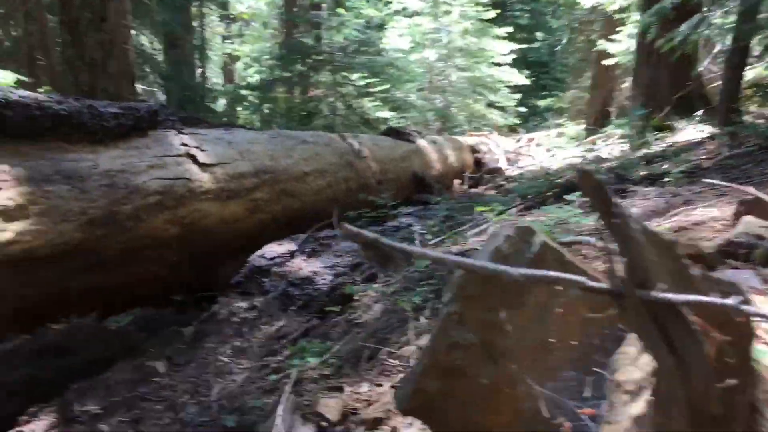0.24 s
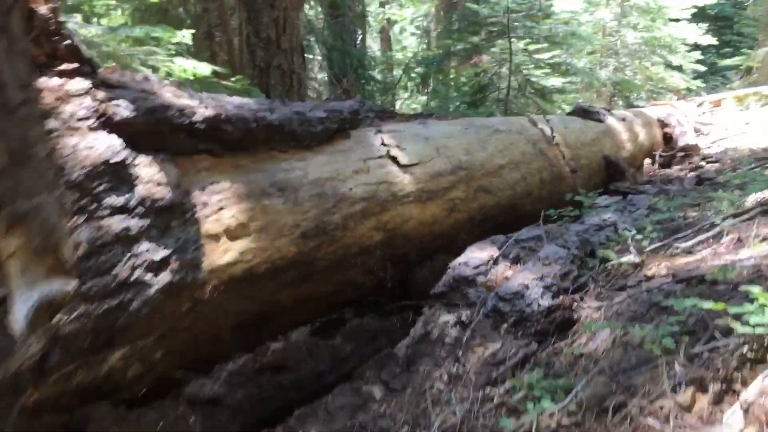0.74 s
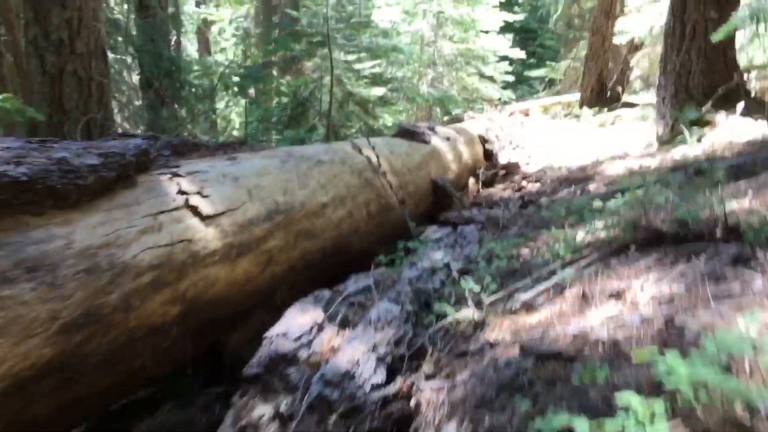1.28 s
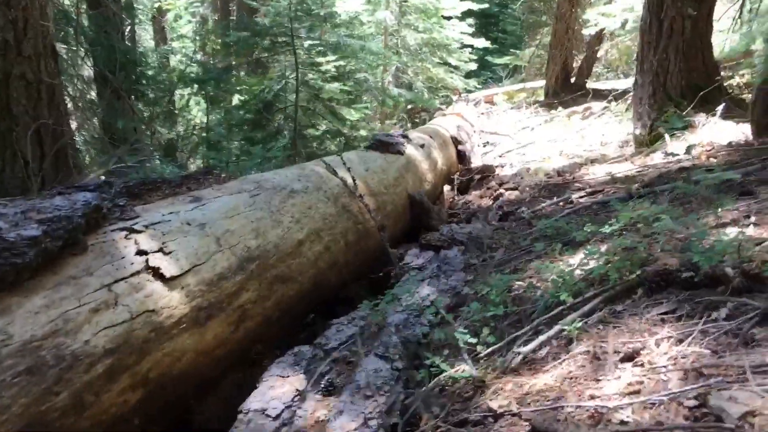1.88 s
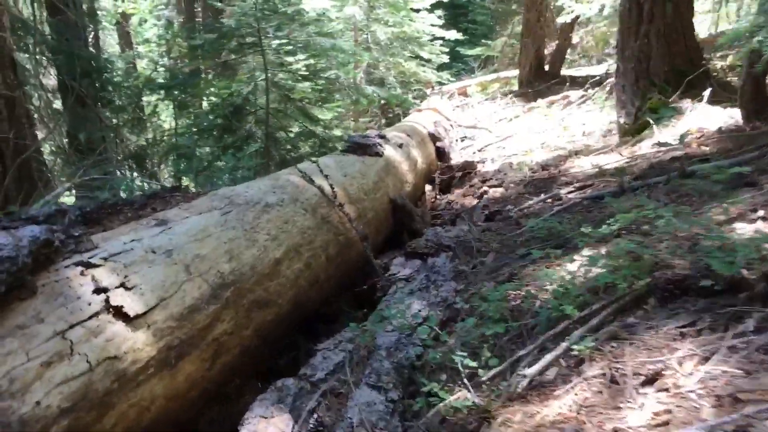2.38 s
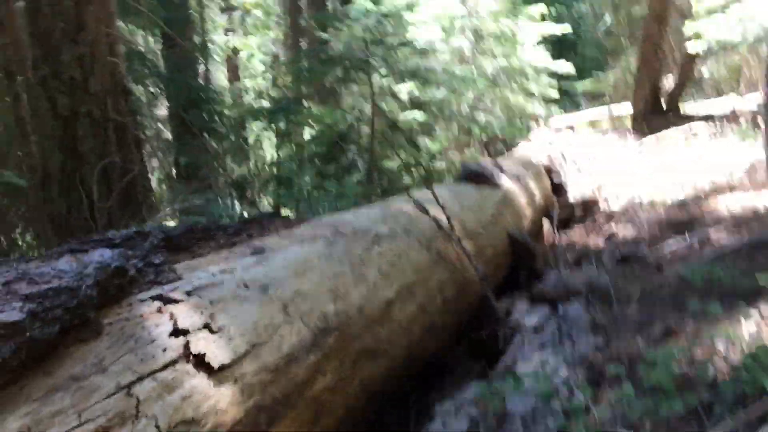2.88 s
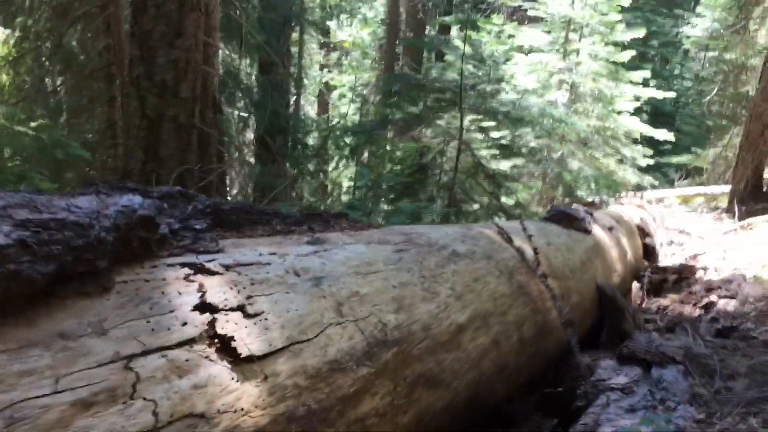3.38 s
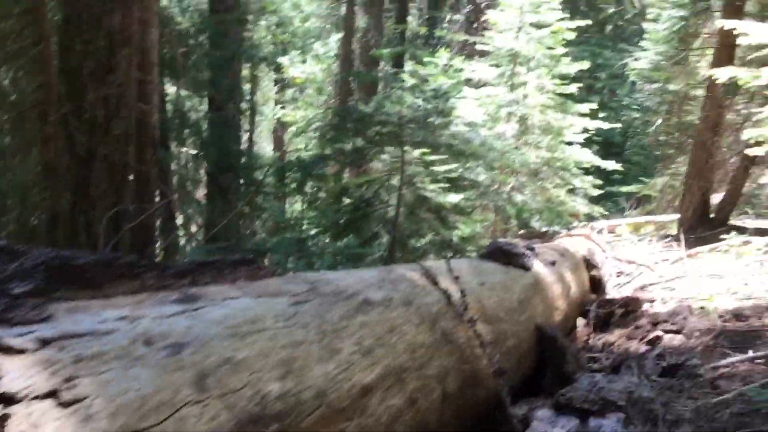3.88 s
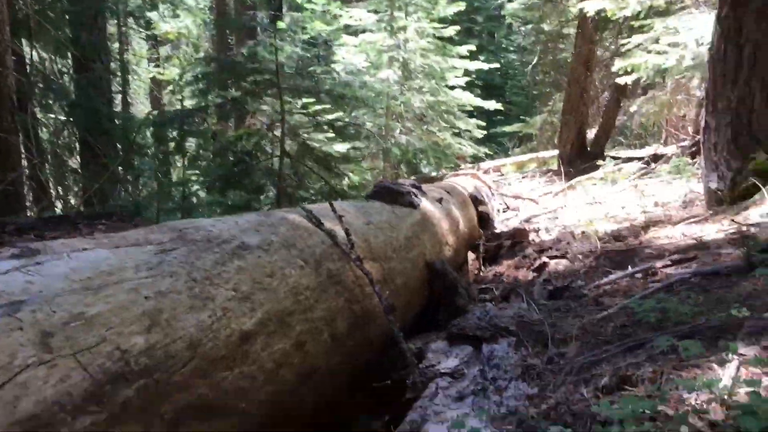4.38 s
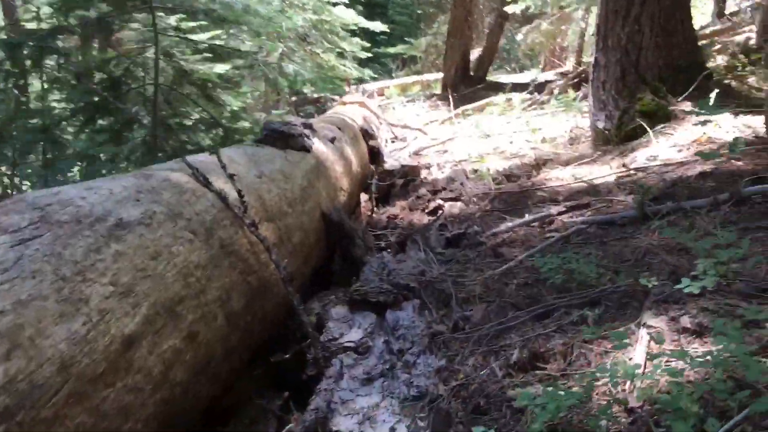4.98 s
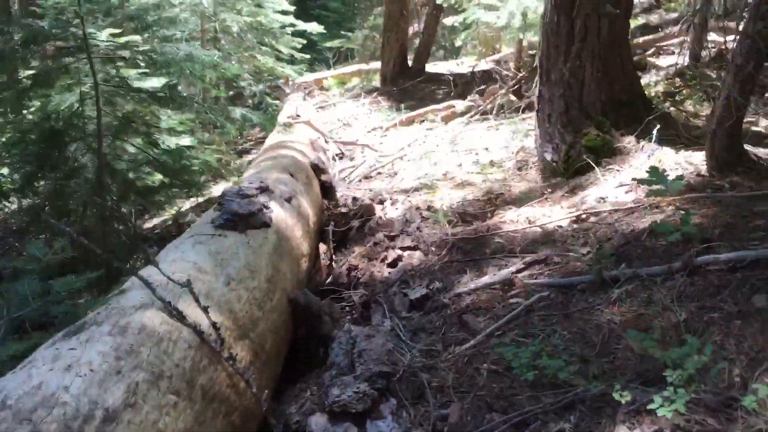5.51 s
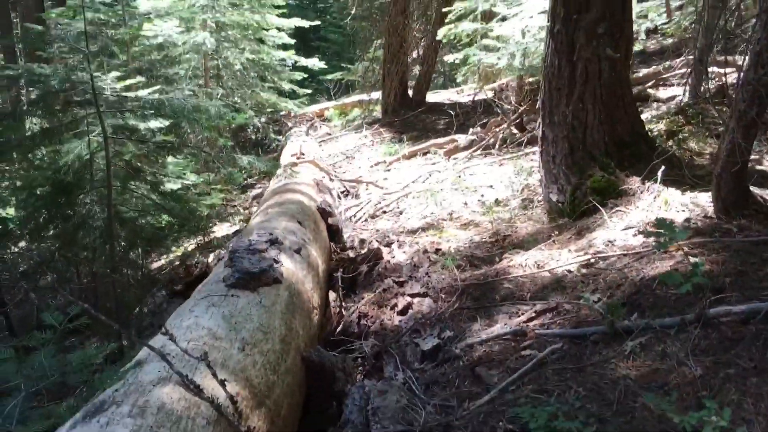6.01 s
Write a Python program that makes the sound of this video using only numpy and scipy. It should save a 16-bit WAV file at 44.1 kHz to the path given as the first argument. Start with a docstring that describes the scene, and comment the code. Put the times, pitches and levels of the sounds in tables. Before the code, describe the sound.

Someone picks their way over dry forest litter, rustling, crackling, snapping twigs and thumping softly on springy ground, growing busier towards the end.

```python
"""Footsteps pick their way down a steep forest slope of dry needles and twigs: each stroke of a foot
is friction noise in three colours, scuff, rustle and crisp crackle, roughened by tiny breaks and ticks.
Twigs snap as volleys of noise ringing at their pitch; five short damped tones colour the loud snap.
Heels and weight thud as decaying sines on soft ground, and slipping soles rasp through resonances.
Behind them lie faint noise echoes from the trunks and the forest's even hush of coloured noise."""
import sys
import numpy as np
from scipy import signal
from scipy.fft import rfft, irfft, next_fast_len
from scipy.io import wavfile

SR = 44100
rng = np.random.default_rng(int(sys.argv[2]) if len(sys.argv) > 2 else 0)


def store_wav(level_fs):
    """Save 16-bit WAV to argv[1]."""
    pcm = np.round(np.clip(np.atleast_2d(level_fs), -1, 1) * 32767)
    wavfile.write(sys.argv[1], SR, pcm.T.astype(np.int16))


N = 275625

# forest hush, relative spectrum: [f/Hz, level/dB per Hz]
FOREST_SPECTRUM = [(22, 3), (60, 2.5), (130, 0.5), (350, -1.5), (500, -4.5), (1000, -9), (2000, -18),
                   (3000, -21), (6000, -27.5), (10400, -28), (16000, -32)]
FOREST_DB = -62
CUTOFF_HZ = 16000
# the sole slipping downhill: [start t/s, end t/s, rasp level/dB, rasp f/Hz]
SOLE_SLIDES = [(0.658, 0.76, -63, 1010), (3.196, 3.424, -57.5, 957), (4.456, 4.525, -57, 556)]
# footfalls, a heel knock and then the weight: [t/s, heel level/dB, heel f/Hz, weight level/dB]
FOOTFALL_HITS = [(0.891, -34, 438, -40.5), (1.123, -53.5, 200, -42.5), (1.4342, -28, 220, -42),
                 (2.334, -38, 160, -60), (2.749, -28, 252, -54), (3.536, -64, 204, -48),
                 (3.975, -39.5, 165, -48), (4.070, -37.5, 207.5, -33), (4.25, -52, 200.6, -34.5),
                 (4.286, -46, 199.7, -32), (4.473, -52, 200.4, -37.5), (5.023, -47, 112, -57),
                 (5.4865, -21, 185, -31.5), (5.911, -43.5, 322, -65)]
WEIGHT_LAG_S, SOIL_HZ = 0.016, 65   # the weight sinks in just after the heel and swings the soil
HEEL_SWINGS, SOIL_SWINGS = 8.7, 12.7   # cycles for a fall of 60 dB
# short damped tones that colour the loud snap: [f/Hz, starting level/dB]
SNAP_TONES = [(470, -34), (1210, -27.5), (2090, -34.5), (3570, -28), (4110, -27)]
SNAP_TONES_AT_S, SNAP_TONES_T60_S = .8885, 0.031
# twigs breaking at set times, strong and faint, levels before the band slope:
# [t/s, ring f/Hz, wooden knock level/dB, crack level/dB, splinter level/dB]
TWIG_SNAPS = [(0.087, 6550, -60, -60.5, -57), (0.8814, 2020, -42, -24, -42), (0.8879, 2000, -39, -25, -28),
              (1.0737, 5860, -65, -46.5, -50), (1.1500, 6660, -58, -38.5, -41),
              (1.2154, 9600, -67.5, -59, -51), (1.4068, 8650, -46, -38, -41.5),
              (1.4286, 2330, -56, -46, -44), (1.4339, 1010, -29, -28.5, -32),
              (1.4529, 3140, -42, -34.5, -36.5), (1.5677, 3700, -40.5, -40, -35),
              (1.602, 4650, -52, -41.5, -41), (1.689, 2860, -65, -54, -57), (1.7068, 4660, -56, -60, -52),
              (2.032, 3200, -62.5, -41.5, -47), (2.0385, 3530, -70, -46, -52),
              (2.1213, 2960, -65, -44, -56), (2.139, 6100, -70, -47, -53), (2.2104, 4726, -63.5, -45, -51),
              (2.3050, 5500, -62.5, -56, -36), (2.3086, 5700, -50, -31, -43),
              (2.3134, 3080, -43, -24.5, -28.5), (2.3917, 2044, -55.5, -48, -54.5),
              (2.4376, 5130, -69.5, -51.5, -53.5), (3.396, 4430, -49.5, -40, -47.5),
              (4.0098, 1960, -56, -40.5, -48), (4.0193, 6060, -65, -52, -49.5),
              (4.069, 1047, -44, -56, -73), (4.1316, 2302, -48.5, -34.5, -42.5),
              (4.3259, 8400, -50.5, -65, -51), (4.6133, 10800, -43, -37, -30),
              (4.6193, 3700, -38, -33, -30), (4.6274, 3840, -50, -40, -36), (4.656, 7140, -42, -58, -52),
              (4.7058, 1540, -35, -38, -48.5), (4.7628, 2510, -51, -51, -49.5),
              (4.7903, 1190, -33.5, -39, -38.5), (4.9212, 5940, -52, -49, -53),
              (4.9535, 4250, -41.5, -40, -40), (5.01, 6250, -66, -48, -43.5),
              (5.0251, 2000, -43.5, -40, -47), (5.0378, 6100, -56, -41, -51), (5.1664, 2100, -47, -43, -59),
              (5.2568, 4260, -43, -47, -57), (5.2691, 4330, -46, -46, -60),
              (5.2934, 1457, -45.5, -44.5, -45), (5.3174, 1830, -33.5, -32, -34.5),
              (5.3522, 6090, -51, -43, -46), (5.4475, 1020, -49, -48, -59), (5.488, 856, -39, -33.5, -43)]
# a stronger twig takes longer to tear: time at a crack of TEAR_AT_DB, and the dB that double it
TEAR_S, TEAR_AT_DB, TEAR_DOUBLES_DB = 0.0016, -38, 25.5
THIN_HZ, THIN_POWER = 3000, 0.44   # a thin, high-pitched twig breaks sooner
# small twigs under the sole: rate at the hardest rustle, crack level over the rustle, its scatter
SPRIGS_PER_S, SPRIG_OVER_DB, SPRIG_SPREAD_DB = 32, 1, 1.5
SPRIG_LOW_HZ, SPRIG_HIGH_HZ = 1300, 7700
# relative spectra of the dull scuff, the needle rustle and the crisp flakes of bark:
# [f/Hz, level/dB per Hz]
SCUFF_SPECTRUM = [(25, -0.5), (60, 7.5), (120, -1.5), (240, -1.5), (340, -2), (480, -7.5), (700, -7),
                  (1000, -6.5), (1400, -9), (2200, -24), (4000, -64)]
NEEDLE_SPECTRUM = [(700, -8.5), (1300, 1), (1900, 5), (2800, 0.5), (4200, 1.5), (5500, -11.5), (8000, -14)]
FLAKE_SPECTRUM = [(3500, -32), (5500, 5), (6700, 0.5), (9200, -1.5), (12000, -5.5), (16000, -12)]
# strokes of a foot through the litter, levels before the layer trims:
# [full-level start t/s, hold t/s, scuff level/dB, rustle level/dB, crisp level/dB]
FOOT_STROKES = [(0.053, 0.17, -63, -66.5, -77.5), (0.461, 0.32, -56.5, -63.5, -68),
                (0.653, 0.091, -52, -57, -71), (0.907, 0.11, -58, -68, -78),
                (1.106, 0.15, -60.5, -63.5, -62.5), (1.568, 0.12, -67, -68.5, -70),
                (1.794, 0.29, -63, -71.5, -85), (2.027, 0.03, -56.5, -51, -59),
                (2.085, 0.074, -62.5, -57, -63), (2.36, 0.20, -62, -64, -65.5),
                (2.586, 0.33, -62.5, -63.5, -67.5), (2.2, 0.031, -60, -52.5, -53.5),
                (2.706, 0.076, -57, -61.5, -62.5), (3.126, 0.43, -59.5, -63.5, -69),
                (3.199, 0.19, -51.5, -55.5, -62), (3.771, 0.062, -60.5, -55, -61.5),
                (3.867, 0.32, -57.5, -56.5, -63.5), (4.223, 0.047, -55.5, -51.5, -57),
                (4.282, 0.119, -53, -54.5, -60), (4.442, 0.076, -52, -53.5, -64),
                (4.572, 0.08, -50.5, -51.5, -53), (4.687, 0.24, -58, -55.5, -58),
                (4.801, 0.061, -55.5, -52.5, -58), (5.02, 0.038, -56, -55, -59),
                (5.205, 0.13, -55, -52, -59), (5.397, 0.09, -60, -54.5, -60),
                (5.569, 0.13, -61.5, -67, -68), (6.079, 0.09, -66.5, -71, -78),
                (5.488, 0.035, -50.5, -46.5, -54.5)]
# a stroke swells ahead of its start, at a pace set by a share of its hold, and dies away after it
STROKE_RISE_SHARE, STROKE_RELEASE_S = 0.35, 0.02
# faint stirring of the litter under all strokes, before the trims: [scuff, rustle, crisp level/dB]
STIR_LEVELS_DB = [-68, -68, -76]


def from_db(db):
    """Decibels to gain."""
    return np.exp(np.asarray(db) * np.log(10) / 20)


def rms_one(x):
    """Scale to rms 1."""
    return x / np.sqrt(np.mean(x ** 2) + 1e-20)


def drift(rate):
    """Slow random wander with spread 1, quicker for a higher rate."""
    step = 40   # samples between computed points
    r = np.exp(-2 * step * np.pi * rate / SR)
    noise = rng.standard_normal(N // step + 2002)
    slow = signal.lfilter([1], [1, -2 * r, r * r], noise)[2000:]   # skip the filter's settling
    return np.interp(np.arange(N) / step, np.arange(len(slow)), rms_one(slow))


def band(x, low_hz, high_hz, order=2):
    """Causal band-pass."""
    sos = signal.butter(order, [low_hz, min(high_hz, .45 * SR)], "band", fs=SR, output="sos")
    return signal.sosfilt(sos, x)


def resonate(x, hz, q):
    """One resonance with gain 1 at its peak."""
    hz = min(hz, .4 * SR)
    r = np.exp(-np.pi * hz / q / SR)
    zeros = np.array([1, 0, -1]) * (1 - r * r) / 2
    poles = [1, -2 * r * np.cos(2 * np.pi * hz / SR), r * r]
    return signal.lfilter(zeros, poles, x)


def colour(x, spectrum):
    """Give a signal a smooth spectrum; rms 1."""
    hz, level_db = np.transpose(spectrum)
    size = next_fast_len(N)
    f = np.maximum(np.fft.rfftfreq(size, 1 / SR), 1)
    gain = from_db(np.interp(np.log(f), np.log(hz), level_db))
    return rms_one(irfft(rfft(x, size) * gain, size)[:N])


def add(out, s, sound):
    """Mix a sound in at a time in seconds."""
    at = max(round(s * SR), 0)
    out[at:at + len(sound)] += sound[:max(N - at, 0)]


def forest_hush():
    """The forest is steady noise with a sloping spectrum."""
    return from_db(FOREST_DB) * colour(rng.standard_normal(N), FOREST_SPECTRUM)


def trunks(x, wet_db=-33):
    """Faint, dull reflections come back from the trees as a decaying noise tail."""
    t = np.arange(SR) / SR
    fade = from_db(-60 * t / .6) * (t > .008)   # 0.6 s for 60 dB, after an 8 ms gap
    echoes = band(rng.standard_normal(SR), 360, 9000, order=1) * fade
    return from_db(wet_db) * signal.fftconvolve(x, echoes / np.linalg.norm(echoes))[:N]


def slides(rise_s=0.0064, fall_s=0.01, sole_hz=310, sole_db=1.0):
    """Quick slips of the tread rasp over the ground and drum on the sole."""
    out = np.zeros(N)
    for start, end, db, hz in SOLE_SLIDES:
        t = np.arange(max(round((end - start) * SR), SR // 100)) / SR
        slips = rng.standard_normal(len(t)) * (rng.random(len(t)) < 900 / SR)   # 900 slips a second
        rasp = rms_one(resonate(resonate(slips, hz, 8.9), hz, 8.9))
        drum = rms_one(resonate(resonate(slips, sole_hz, 1.8), sole_hz, 1.8))
        envelope = np.minimum(1, np.minimum(t / rise_s, (t[-1] - t) / fall_s))
        add(out, start, from_db(db) * envelope * (rasp + from_db(sole_db) * drum))
    return out


def thud(db, hz, swings, rise_s=0.0024, crumble_db=-9):
    """The springy soil gives a few damped swings and crumbles a little."""
    t = np.arange(SR // 3) / SR
    crumble = rms_one(band(rng.standard_normal(len(t)), .5 * hz, 2.15 * hz))
    swing = np.sin(2 * np.pi * hz * t) + from_db(crumble_db) * crumble
    decay = from_db(db - 60 * t * hz / swings)
    return swing * decay * (1 - np.exp(-t / rise_s))


def footfalls():
    """A short knock of the heel, then a deep thump as the weight comes down."""
    out = np.zeros(N)
    for s, heel_db, heel_hz, weight_db in FOOTFALL_HITS:
        add(out, s, thud(heel_db, heel_hz, HEEL_SWINGS))
        add(out, s + WEIGHT_LAG_S, thud(weight_db, SOIL_HZ, SOIL_SWINGS))
    return out


def snap_tones():
    """Five short damped tones colour the loud snap, all decaying at one rate."""
    out, t = np.zeros(N), np.arange(SR // 10) / SR
    tones = sum(from_db(db) * np.sin(2 * np.pi * hz * t) for hz, db in SNAP_TONES)
    add(out, SNAP_TONES_AT_S, tones * from_db(-60 * t / SNAP_TONES_T60_S))
    return out


def stroke_levels():
    """Scuff, rustle and crisp levels in dB: the powers of all strokes add up over the stirring."""
    t = np.arange(N) / SR
    power = np.outer(from_db(STIR_LEVELS_DB) ** 2, np.ones(N))
    for start, length, *levels_db in FOOT_STROKES:
        swell = np.exp(np.clip((t - start) / (STROKE_RISE_SHARE * length), -20, 0))
        release = np.exp(-np.clip((t - start - length) / STROKE_RELEASE_S, 0, 20))
        power += np.outer(from_db(levels_db), swell * release) ** 2
    return 10 * np.log10(power)


def snap(bank, hz, knock_db, crack_db, splinter_db, tear_s, ring_db=6, ring_q=10, ring_octaves=0.4,
         scatter_db=-17, scatter_s=0.0078, ragged_db=2.5):
    """Fibres tear in a quick volley, the stick rings at its pitch, and the ground scatters the sound."""
    t = np.arange(SR // 18) / SR
    attack = t < .0047   # the part that sets the level
    fibres = rng.standard_normal(len(t)) * from_db(ragged_db * rng.standard_normal(len(t)))
    volley = fibres * (1 - np.exp(-t / (0.23 * tear_s))) * np.exp(-(t / tear_s) ** 2)
    bounce = np.roll(volley, int(rng.uniform(.001, .0025) * SR))   # off the ground, a little later
    direct = volley + 0.47 * bounce
    scatter = rng.standard_normal(len(t)) * from_db(scatter_db) * np.exp(-t / scatter_s)
    stick = direct + 2 * resonate(direct, hz, ring_q) + scatter
    # band by band: a smooth slope from knock to splinter, raised where the stick rings
    centres, filters = zip(*bank)
    slope_hz = [550, 1100, 1700, 3900, 6500, 14000]
    slope_points_db = [knock_db - 12, knock_db - 8, crack_db - 12, crack_db - 8,
                       splinter_db - 6.5, splinter_db - 8.5]
    slope_db = np.interp(np.log(centres), np.log(slope_hz), slope_points_db)
    octaves_off = np.log2(np.array(centres) / hz)
    levels_db = slope_db + ring_db * np.exp(-(octaves_off / ring_octaves) ** 2)
    out = np.zeros(len(t))
    for k, sos in enumerate(filters):
        part = signal.sosfilt(sos, stick)
        out += (-1) ** k * from_db(levels_db[k]) * part / np.std(part[attack])   # signs alternate
    return out


def sprigs(knock_db=-7, splinter_db=-6, count=300):
    """Rows of small twigs by chance, more frequent and louder the harder the foot rustles."""
    rustle_db = stroke_levels()[1]
    rows = []
    draws = zip(rng.random((count, 3)), rng.standard_normal((count, 3)))
    for (when, chance, thinness), scatter in draws:
        here_db = rustle_db[int(when * N)]
        likely = SPRIGS_PER_S * N / SR / count * from_db(.5 * (here_db - rustle_db.max()))
        if chance < likely:
            hz = SPRIG_LOW_HZ * (SPRIG_HIGH_HZ / SPRIG_LOW_HZ) ** thinness
            base_db = here_db + SPRIG_OVER_DB + SPRIG_SPREAD_DB * scatter
            rows.append((when * N / SR, hz, *(base_db + [knock_db, 0, splinter_db])))
    return rows


def twigs():
    """Twigs at set times, and more small ones by chance; the stronger and thicker tear longer."""
    edges = np.geomspace(480, 16500, 11)   # half-octave bands
    bank = [(np.sqrt(low * high), signal.butter(2, [low, high], "band", fs=SR, output="sos"))
            for low, high in zip(edges, edges[1:])]
    out = np.zeros(N)
    for s, hz, knock_db, crack_db, splinter_db in [*TWIG_SNAPS, *sprigs()]:
        strength = 2 ** ((crack_db - TEAR_AT_DB) / TEAR_DOUBLES_DB)
        tear_s = TEAR_S * strength * (THIN_HZ / hz) ** THIN_POWER
        add(out, s, snap(bank, hz, knock_db, crack_db, splinter_db, tear_s))
    return out


def grains(per_s, spread_db, decay_s):
    """Power envelope, mean 1, of tiny breaks of uneven size that come in clumps."""
    born = rng.random(N) < per_s * from_db(4 * drift(12)) / SR
    sizes = np.minimum(rng.exponential(1, N)[born], 3)
    power = np.zeros(N)
    power[born] = from_db(spread_db * sizes) ** 2
    power = signal.lfilter([1], [1, -np.exp(-2 / (decay_s * SR))], power + 1e-12)
    return power / power.mean()


def crunch(spectrum, breaks, share):
    """Smooth friction with a share of its power in separate breaks; rms 1."""
    share = np.clip(share, 0, 1)
    return colour(rng.standard_normal(N) * np.sqrt(1 - share + share * breaks), spectrum)


def crackle(level_db, per_s, spread_db, count=24):
    """Single needles give way in dry ticks of varied colour; more of them as the foot bears down."""
    t = np.arange(SR // 100) / SR
    fade = np.exp(-t / .0004) + .15 * np.exp(-t / .003)   # sharp tick, short tail
    bursts = rng.standard_normal((count, len(t))) * fade
    shapes = []
    for burst, hz in zip(bursts, np.geomspace(2000, 11000, count)):
        ringing = burst + 3 * resonate(burst, hz, 7.2)
        shapes.append(rms_one(band(ringing, .5 * hz, CUTOFF_HZ, order=1)))
    busy = from_db(.5 * (level_db - level_db.max()))
    born = np.flatnonzero(rng.random(N) < per_s * busy / SR)
    ticks = np.zeros(N)
    for at, (size, kind) in zip(born, rng.random((len(born), 2))):
        strength = from_db(spread_db * size ** 2) / np.sqrt(busy[at])   # makes up for sparser ticks
        add(ticks, at / SR, strength * shapes[int(kind * count)])
    return from_db(level_db) * rms_one(ticks)


def litter():
    """The sole rubs unevenly over the ground; needles and flakes of bark break under it."""
    scuff_db, rustle_db, crisp_db = stroke_levels()
    # a dragged foot mostly hisses; one that bears down turns crisp and breaks the litter in grains
    crush = np.clip((crisp_db - scuff_db + 14) / 12, .2, 1)
    grip = drift(52)
    needles = grains(per_s=230, spread_db=5, decay_s=.002)
    flakes = grains(per_s=400, spread_db=5, decay_s=.001)
    # each level: stroke, layer trim, then the uneven grip
    scuff_gain = from_db(scuff_db + 1.5 + 1.05 * grip)
    rustle_gain = from_db(rustle_db - 1.1 + 2.8 * grip)
    crisp_gain = from_db(crisp_db + 0.53 + 1.2 * grip)
    scuff = scuff_gain * crunch(SCUFF_SPECTRUM, needles, share=0.44)
    rustle = rustle_gain * crunch(NEEDLE_SPECTRUM, needles, share=0.42 * crush)
    crisp = crisp_gain * crunch(FLAKE_SPECTRUM, (needles + flakes) / 2, share=0.77 * crush)
    ticks = crush * crackle((crisp_db + rustle_db) / 2 - 1.5, per_s=130, spread_db=16)
    return scuff + rustle + crisp + ticks


def scene():
    """Feet close by, their echoes from the trunks, and the hush of the forest."""
    feet = twigs() + snap_tones() + footfalls() + slides() + litter()
    return (feet + trunks(feet) + forest_hush())[None]


def record(dry, notch_hz=10400, notch_q=7, notch_depth=0.35):
    """The small microphone loses the deepest bass and dips in the treble; the top is cut steeply."""
    thin = signal.sosfilt(signal.butter(2, 36, "high", fs=SR, output="sos"), dry)
    dipped = thin - notch_depth * resonate(thin, notch_hz, notch_q)
    return signal.sosfilt(signal.ellip(10, .1, 70, CUTOFF_HZ, fs=SR, output="sos"), dipped)


dry = scene()
out = record(dry)
store_wav(out)
```